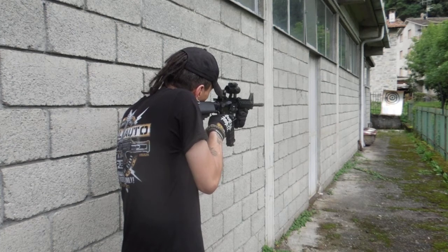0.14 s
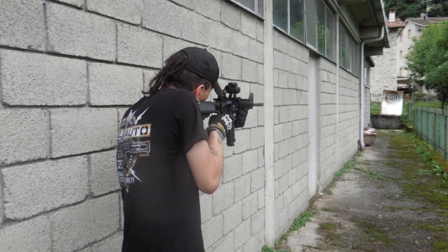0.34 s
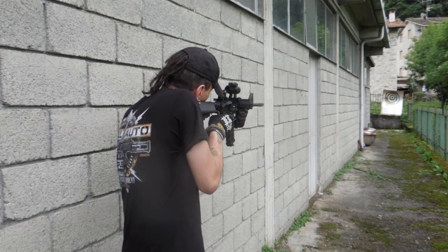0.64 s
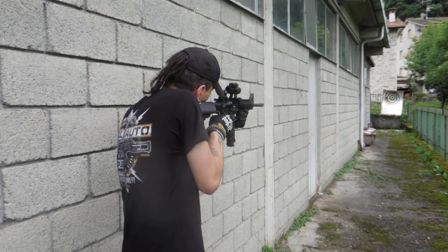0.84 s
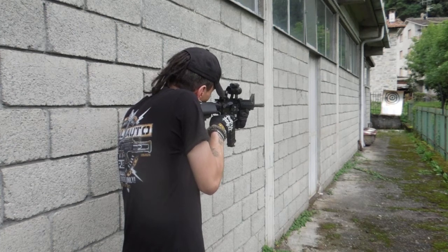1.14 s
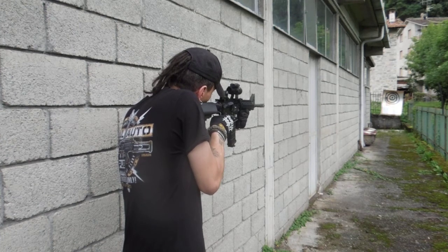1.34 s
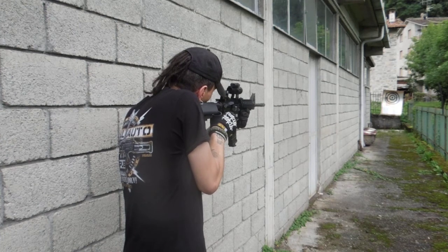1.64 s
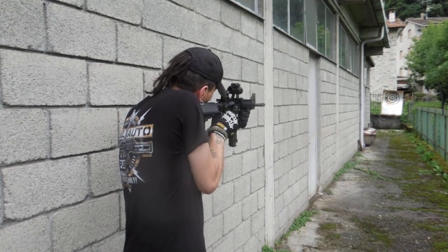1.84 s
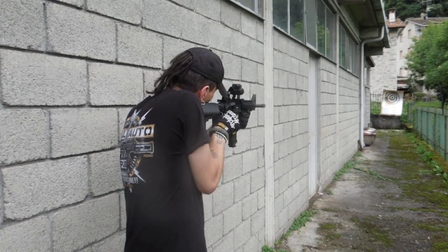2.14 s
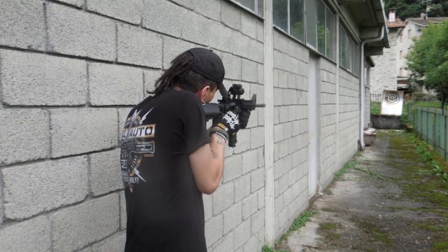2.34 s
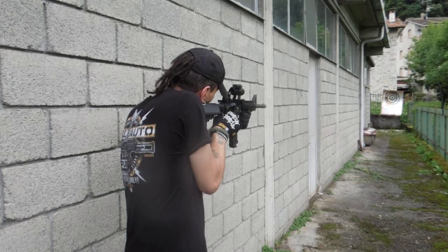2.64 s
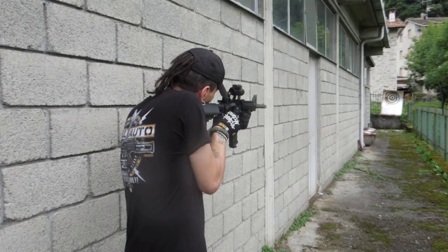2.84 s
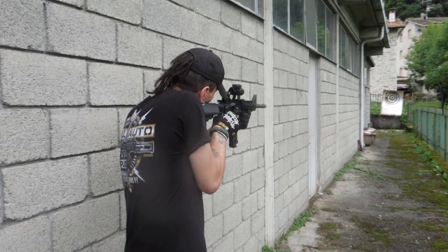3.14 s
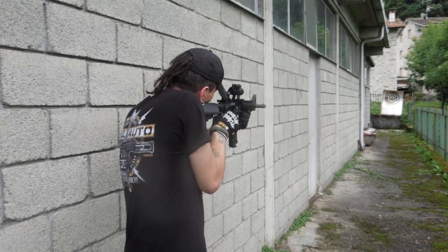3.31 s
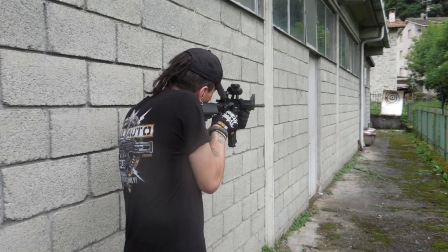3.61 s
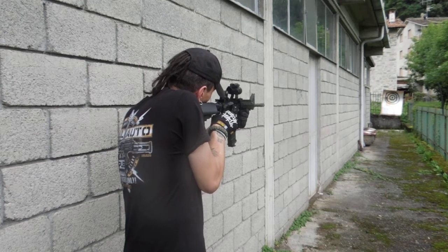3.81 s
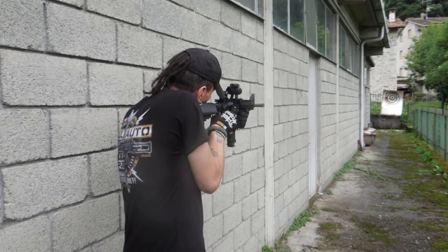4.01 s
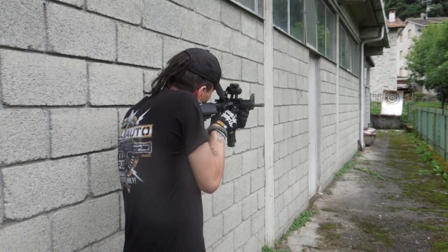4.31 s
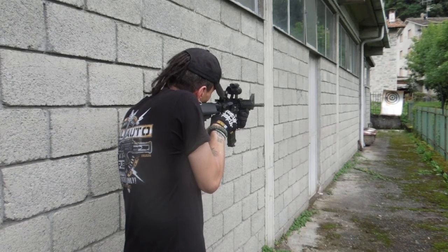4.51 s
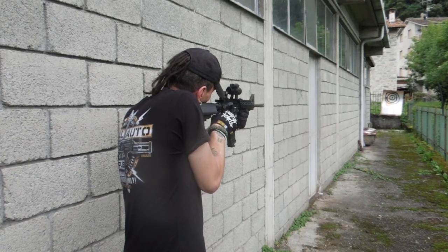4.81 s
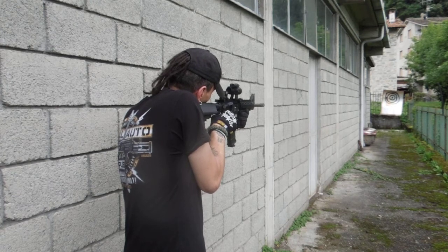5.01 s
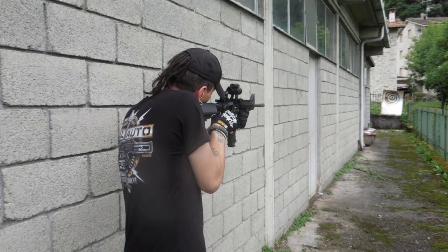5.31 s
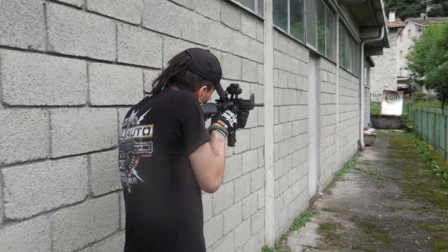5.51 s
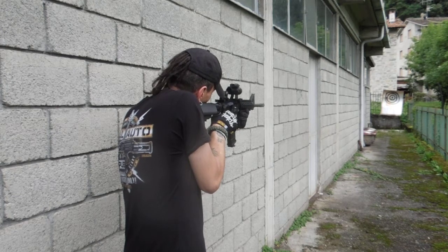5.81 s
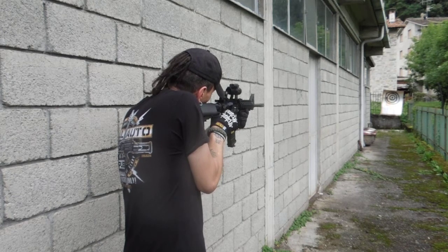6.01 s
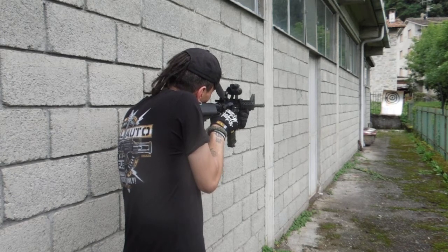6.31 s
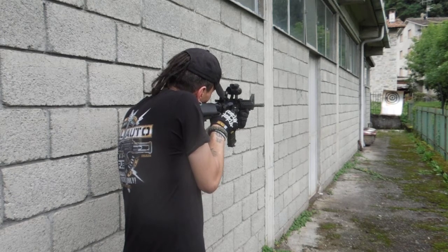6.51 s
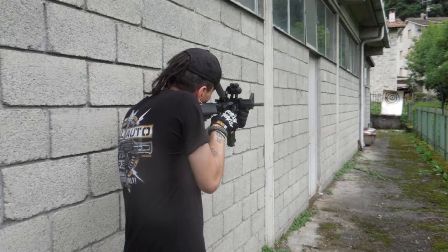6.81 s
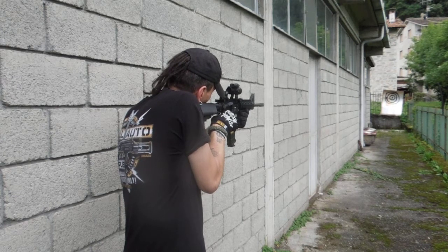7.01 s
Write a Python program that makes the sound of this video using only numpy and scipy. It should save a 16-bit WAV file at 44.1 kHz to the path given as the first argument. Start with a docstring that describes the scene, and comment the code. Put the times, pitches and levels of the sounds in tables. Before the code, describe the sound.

Close by, an electric airsoft rifle fires a steady string of single snaps, each with a tiny gear whirr, dry crack and small air pop. After a pause come four short automatic bursts about a second apart, then two single shots. Pellets ping on a distant sheet-metal target nearly half a second later. A hard block wall adds brief clatter; faint outdoor rush lies beneath. Close stereo microphone with automatic level control.

```python
"""An electric airsoft rifle is fired beside a block wall: a string of single shots, four bursts, two more shots.
In each round the gearbox whirrs as it draws the piston back, then the piston slams home and the muzzle pops.
Almost half a second later the pellet pings on a far metal target; the first pings are from shots before the start.
Low noise lies underneath: outdoor rush, plus the target's low ringing after the bursts. A low hum comes and goes
near the last single shots, and ticks dot the pauses. A gain control starts turned down, sinks and recovers."""
import sys
import numpy as np
from scipy import signal
from scipy.fft import rfft, irfft
from scipy.io import wavfile
from scipy.ndimage import uniform_filter1d

SR = 44100
rng = np.random.default_rng(int(sys.argv[2]) if len(sys.argv) > 2 else 0)


def persist_wave(psi):
    """Save psi, clipped to +-1, as 16-bit WAV."""
    counts = np.round(np.clip(psi, -1, 1) * 32767).astype(np.int16)
    wavfile.write(sys.argv[1], SR, np.atleast_2d(counts).T)


N = 315315

# All levels in the tables are relative and get scaled where they are used.
# Colour of the low background noise: [f/Hz, level/dB]
BACKGROUND_COLOUR = [(15, -25), (28, -2), (70, -5), (120, -4), (240, -5), (430, -6.5), (600, -13),
                     (850, -11.5), (1400, -21), (3500, -30), (14300, -38)]
# Level of the low background noise: outdoor rush, plus the target's low ringing after the bursts: [t/s, level/dB]
BACKGROUND_LEVEL = [(0, -41.5), (1.5, -42), (2.3, -44.5), (3.1, -43.5), (4.3, -38), (5.1, -45.5),
                    (5.5, -37.5), (6.1, -43.5), (7.15, -38)]
# Path of the low hum: [t/s, f/Hz, level/dB]
HUM_PATH = [(1.0, 159, -58), (1.148, 158.7, -45.5), (1.501, 164.6, -40), (1.62, 170, -54),
            (1.75, 171.6, -43), (1.88, 172.3, -56), (2.0, 171.5, -41), (2.149, 168, -64)]
# Faint ticks in the pauses: [t/s, level/dB]
TICK_TIMES = [(.577, -46), (.736, -39), (4.15, -38), (5.09, -33), (6.058, -27), (6.09, -34)]

# Trigger pulls: [t of the first slam/s, number of rounds, piston crack level/dB, body clatter level/dB,
#  pellet lateness/s, ping level/dB]
TRIGGER_PULLS = [(-.364, 1, -5, -20, 0.003, -8), (-.205, 1, -5, -20, .0041, -10),
                 (-.01, 1, -9, -18, -0.0018, -13), (.1356, 1, -3.5, -18.5, 0.0082, -12),
                 (0.3031, 1, -4.5, -19.5, .0044, -13.5), (.4778, 1, -6, -20.5, 0.0036, -14),
                 (0.66, 1, -8, -22, 0.0034, -10.5), (0.819, 1, -7, -22.5, -0.00011, -10.5),
                 (.9963, 1, -8.5, -22, 0.0038, -13.5), (1.1646, 1, -5, -20, .0039, -15),
                 (1.3412, 1, -5.5, -19, 0.0047, -16), (1.4968, 1, -7, -22, 0.0031, -15),
                 (2.7902, 6, -2.5, -16, .0016, -12), (3.7927, 5, -4, -16, -0.0049, -10.5),
                 (4.7335, 5, -8.5, -19.5, -0.0069, -14), (5.6746, 6, -4.5, -15, -.0048, -12.5),
                 (6.81, 1, -4.5, -13.5, 0, -16), (7.0385, 1, -1.5, -13, -0.0063, -18)]
CYCLE_S = .0613  # one round in automatic fire
FLIGHT_S = .445  # a pellet's usual flight plus the sound's way back
FLIGHT_STEP_S = -.001  # each further pellet of a burst takes a little less time
CRACK_STEP_DB, CLATTER_STEP_DB, PING_STEP_DB = -0.46, -0.41, 0.13  # from one round of a burst to the next
COLD_START_DB, RUNNING_DB = -1, 4  # the gears are softer from rest than when already turning

# Colour of the target's bright ping: [f/Hz, level/dB]
PING_COLOUR = [(200, -16), (600, -38), (1700, -11.5), (3500, -15), (7000, -11), (8800, -4), (10800, 3.5),
               (12500, 2.5), (14300, -9)]
# Colour of the target's shimmer: [f/Hz, level/dB]
SHIMMER_COLOUR = [(80, -30), (300, -2.5), (600, -4), (1700, -0.5), (2100, -14), (2600, -2.5), (4500, 1),
                  (7200, 0.5), (9500, 4), (11500, 2.5), (14300, 0.5)]
# Colour of the lingering, duller part of the ring: [f/Hz, level/dB]
LINGER_COLOUR = [(80, -20), (300, -10.5), (600, -1.5), (1100, -3.5), (1700, -3), (2600, -3), (5000, -12),
                 (14300, -12.5)]
# Ringing tones of the target sheet: [f/Hz, level/dB, time to fall 60 dB/s]
SHEET_TONES = [(255, -19, 0.28), (306.3, -14, 1), (1060, -17.5, 1), (1570, -13.5, 0.85), (1705, -9, 0.57),
               (1735, -11, .4), (2550, -9, 0.45), (3350, -9.5, 0.51), (3700, -13, 0.29), (5790, -15, 0.23)]
RING_DB = -13.5  # scales the target's ring against its ping

# Gearbox effort through one winding cycle: [t from the slam/s, level/dB]
WINDING_EFFORT = [(-.075, -35.5), (-.062, -7.5), (-.056, -3.5), (-.035, -0.5), (-.008, 1.5), (.002, -4),
                  (.025, -23)]
# Latch and gear clacks in each cycle: [t from the slam/s, level over the gearbox/dB]
CLACK_TIMES = [(-.0583, 11.5), (-.0315, 9), (-.012, 9.5)]
# Meshing teeth over the whole scene: [t/s, basic pitch f/Hz, change in gearbox level/dB]
TOOTH_MESH = [(0, 2420, -1.5), (1.5, 2514, -4), (2.698, 3270, -2.5), (6.001, 3206, -8), (7.1, 3280, -5.5)]
# Colour of the grinding gears: [f/Hz, level/dB]
GEAR_COLOUR = [(80, -52), (300, -10), (600, -8.5), (780, 2.5), (1150, -2), (1700, -1), (3200, 2), (4200, 2),
               (5200, 1.5), (7200, -5), (8200, 0), (9200, -2), (12400, 0), (14300, -1.5)]

# Muzzle pop thrown back by ground, wall and eaves: [delay/s, signed gain]
NEAR_ECHOES = [(.0093, -1.3), (0.011, 0.18), (0.0122, 0.98), (0.0147, -0.44), (0.0175, 0.25), (0.022, 0.87),
               (0.0285, -0.1), (0.0315, 0.8)]
POP_DB, POP_FOLLOWS = -15.5, 0.51  # puff of air, and how closely it follows the slam (dB per dB)

# Colour of the piston crack: [f/Hz, level/dB]
CRACK_COLOUR = [(200, -27), (900, -23), (1600, -8.5), (3200, -15), (4700, -2.5), (6000, -3), (7100, -8),
                (8400, 1.5), (9800, 1), (10700, -3.5), (11800, 2.5), (13000, -4.5), (13800, 5), (14500, -6)]
# Colour of the clatter from the wall: [f/Hz, level/dB]
CLATTER_COLOUR = [(100, -13), (550, -8), (720, 3.5), (1100, -5), (1280, -2.5), (2000, 1), (2600, 0),
                  (3400, 0), (4300, -6), (5600, 1), (7200, -3.5), (8400, 0.5), (10500, -2.5), (14300, -0.5)]
# Narrow rings of the gearbox shell and spring: [f/Hz, level/dB, time to fall 60 dB/s]
SHELL_TONES = [(436.3, -19, 0.2), (695.5, -22, 0.192), (1108, -18, 0.21), (2487, -11, 0.097),
               (3520, -15.5, 0.15), (8290, -10.5, 0.086), (8400, -37, .07), (9920, -15, 0.053),
               (12800, -20, .07), (14300, -27, .06)]
# Colour of the yard's reply, also used for the ticks: [f/Hz, level/dB]
YARD_COLOUR = [(100, -17.5), (500, -10.5), (1050, 4.5), (1400, -4.5), (3500, -7), (7000, -13.5),
               (14300, -12)]
# Late slaps from the yard: [delay/s, level/dB]
YARD_SLAPS = [(.072, -3.5), (.101, -16)]
DETUNE = .006  # typical share by which each blow shifts a ringing tone's pitch

# Basic stereo width of noise: [f/Hz, side level over mid level/dB]
STEREO_WIDTH = [(50, -9), (200, -21), (500, -28), (2800, -32), (4400, -15), (8000, -5), (14000, -3.5)]
# Uneven microphone pair: [f/Hz, left level minus right level/dB]
MIC_TILT = [(60, .7), (250, 0), (5000, 0), (8200, -1.8), (14000, -1.5)]
EDGE_HZ = 14330  # band limit
# gain control: where it starts, how firmly, how fast it moves, how fast it lets go, how far down it opens
THRESHOLD_DB, RATIO, REACT_S, RECOVER_DB_PER_S, OPENING_DUCK_DB = -22, 3.32, 0.23, 19, 11


def amp(db):
    """Turns decibels into a plain factor."""
    return 10 ** (np.asarray(db) / 20)


def evened(x):
    """Scales to rms 1."""
    return x / np.sqrt(np.mean(x ** 2) + 1e-20)


def read(points, hz):
    """Reads a table on a log-frequency axis."""
    f, value = np.transpose(points)
    return np.interp(np.log(hz + 1), np.log(f + 1), value)


def add(mix, s, sound):
    """Mixes a sound in at time s, cutting off whatever falls outside the scene."""
    start = round(s * SR)
    sound = sound[..., max(-start, 0):]
    part = mix[:, max(start, 0):][:, :sound.shape[-1]]
    part += sound[..., :part.shape[-1]]


def smooth_noise(size, span):
    """Slow random wander of rms 1: noise averaged over a span of samples."""
    return evened(uniform_filter1d(rng.standard_normal(size), size=span))


def noise(spectrum, wide_db, size):
    """Stereo noise of a given colour; the middle of its range is closest to mono."""
    hz = np.fft.rfftfreq(size, 1 / SR)
    mid, side = rfft(rng.standard_normal((2, size))) * amp(read(spectrum, hz))
    side = side * amp(read(STEREO_WIDTH, hz) + wide_db)
    return evened(irfft(np.array([mid + side, mid - side]), size))


def recoloured(spectrum, spread_db):
    """No two blows land alike: each resonance answers a little more or less."""
    hz, db = np.transpose(spectrum)
    return np.column_stack([hz, db + spread_db * rng.standard_normal(len(hz))])


def decay(t, rise, t60):
    """Envelope that starts at t = 0, rises and dies away, falling 60 dB in t60 seconds."""
    t = np.maximum(t, 0)
    return (1 - np.exp(-t / rise)) * amp(-60 * t / t60)


def blend(fixed, fresh, share):
    """Part of a sound repeats with every blow, the rest is new."""
    share = np.clip(share, 0, 1)
    return np.sqrt(share) * fixed + np.sqrt(1 - share) * fresh


def rattle(depth_db, size):
    """Millisecond unevenness of loose parts and scattered echoes."""
    return evened(amp(depth_db * smooth_noise(size, span=70)))


def struck(table, t):
    """Each blow wakes the tones with its own strengths, pitches and phases; loose parts roughen the ring."""
    hz, db, t60 = np.transpose(table)[:, :, None]
    strength = rng.uniform(0.57, 1.22, hz.shape) * amp(db)
    waver = smooth_noise(len(t), span=600)
    pitch = hz * (1 + DETUNE * rng.standard_normal(hz.shape))
    turns = pitch * t + rng.random(hz.shape)
    tones = np.cos(2 * np.pi * turns + .8 * waver)
    return (strength * decay(t, rise=0.00038, t60=t60) * tones).sum(0)


def rounds():
    """Every round fired: (s of the slam, crack dB, clatter dB, gears dB, s of the hit, ping dB)."""
    for start, count, crack_db, body_db, late, ping_db in TRIGGER_PULLS:
        for k in range(round(count)):
            s = start + k * CYCLE_S
            clatter_db = body_db + k * CLATTER_STEP_DB
            gears_db = clatter_db + (RUNNING_DB if k else COLD_START_DB)
            hit = s + FLIGHT_S + late + k * FLIGHT_STEP_S
            yield s, crack_db + k * CRACK_STEP_DB, clatter_db, gears_db, hit, ping_db + k * PING_STEP_DB


def background():
    """Low coloured noise stands for the outdoor rush, plus the target's low ringing after the bursts."""
    low_noise = noise(BACKGROUND_COLOUR, wide_db=1, size=N)
    return low_noise * amp(np.interp(np.arange(N) / SR, *np.transpose(BACKGROUND_LEVEL)))


def hum():
    """A soft far-off tone, one sine of drifting pitch, wavers, swells and fades."""
    s, hz, db = np.transpose(HUM_PATH)
    t = np.arange(N) / SR
    waver = 1 + .025 * smooth_noise(N, span=2500)
    level = amp(np.interp(t, s, db)) * (t > s[0]) * (t < s[-1])
    phase = 2 * np.pi * np.cumsum(np.interp(t, s, hz) * waver) / SR
    return np.sqrt(2) * level * np.sin(phase)


def ticks():
    """Small dry ticks, short puffs of noise that die away quickly."""
    out, t = np.zeros((2, N)), np.arange(4096) / SR
    for s, db in TICK_TIMES:
        colour = noise(recoloured(YARD_COLOUR, spread_db=3), wide_db=-3, size=len(t))
        add(out, s, amp(db + 1) * decay(t, rise=.001, t60=0.055) * colour)
    return out


def target():
    """Each pellet gives a bright ping, a faint echo of it and a shimmer of sheet metal that dulls as it fades."""
    out, t = np.zeros((2, N)), np.arange(32768) / SR
    for *_, hit, ping_db in rounds():
        strike = decay(t, rise=0.00069, t60=0.054)
        strike += amp(-15.0) * decay(t - .0495, rise=0.00052, t60=0.12)  # the echo
        ping = strike * noise(PING_COLOUR, wide_db=0.5, size=len(t)) * rattle(depth_db=0.5, size=len(t))
        shimmer = decay(t, rise=0.00043, t60=0.41) * noise(SHIMMER_COLOUR, wide_db=1, size=len(t))
        shimmer *= rattle(depth_db=-0.2, size=len(t))
        linger = decay(t, rise=0.011, t60=1.0) * noise(LINGER_COLOUR, wide_db=-16, size=len(t))
        ring = amp(8.0) * shimmer + amp(-7.5) * linger + struck(SHEET_TONES, t)
        add(out, hit, amp(ping_db) * (amp(5.5) * ping + amp(RING_DB) * ring))
    return out


def gearbox():
    """The motor spins up with a dull whirr; under load the gears grind and whine while latch and rack clack."""
    out, t = np.zeros((2, N)), np.arange(6000) / SR - .1  # t = 0 is the slam
    effort = amp(np.interp(t, *np.transpose(WINDING_EFFORT))) * signal.windows.tukey(len(t), .1)
    spin_up = amp(-5.0) * np.exp(-((t + 0.0672) / 0.0056) ** 2)
    dull = signal.butter(3, 4300, fs=SR, output="sos")
    teeth = noise(GEAR_COLOUR, wide_db=-12.5, size=len(t))  # the same teeth meet in every cycle
    when, mesh_hz, mesh_db = np.transpose(TOOTH_MESH)
    for s, _, _, gears_db, _, _ in rounds():
        wobble = smooth_noise(len(t), span=200)
        speed = 1 - .24 * np.exp(-(t - t[0]) / 0.019) + 0.016 * wobble
        turn = 2 * np.pi * np.cumsum(np.interp(s, when, mesh_hz) * speed) / SR
        fresh = noise(recoloured(GEAR_COLOUR, spread_db=3), wide_db=-13, size=len(t))
        grind = blend(teeth, fresh, share=0.34) * rattle(depth_db=2.5, size=len(t))
        whine = amp(-12) * np.sin(turn)
        whirr = spin_up * signal.sosfilt(dull, grind)
        sound = effort * (amp(2) * grind + whine) + whirr
        for delay, db in CLACK_TIMES:
            force = amp(db + 1.9 * rng.standard_normal())
            clack = noise(recoloured(GEAR_COLOUR, spread_db=1.0), wide_db=-7.5, size=len(t))
            sound += force * decay(t - delay, rise=0.00088, t60=.045) * clack
        level_db = gears_db + np.interp(s, when, mesh_db)
        add(out, s + t[0], amp(level_db) * sound)
    return out


def muzzle():
    """The puff of air is dull from behind; its forward, sharper part comes back as a flutter of echoes."""
    out, t = np.zeros((2, N)), np.arange(3000) / SR - .01
    pop = -.9 * np.exp(-(t / 0.0015) ** 2)
    for delay, gain in NEAR_ECHOES:
        pop += gain * np.exp(-((t - delay) / 0.0006) ** 2)
    pop = signal.sosfilt(signal.butter(1, 45, "high", fs=SR, output="sos"), pop)
    for s, crack_db, *_ in rounds():
        add(out, s + t[0], amp(POP_DB + POP_FOLLOWS * crack_db) * pop)
    return out


def piston():
    """The slam cracks in the gearbox shell; the wall returns a duller clatter, the yard late slaps."""
    out, t = np.zeros((2, N)), np.arange(16384) / SR
    shell = noise(CRACK_COLOUR, wide_db=-6.5, size=len(t))
    wall = noise(CLATTER_COLOUR, wide_db=-6.0, size=len(t))
    # near surfaces return separate knocks over a smooth, scattered decay
    knocks = sum(abs(gain) * decay(t - delay, rise=0.0003, t60=0.011) for delay, gain in NEAR_ECHOES)
    spread = amp(6.0) * decay(t, rise=0.0015, t60=0.077)
    spread += amp(6.5) * decay(t - .0105, rise=0.0014, t60=0.14)
    spread += amp(-0.5) * knocks
    late = amp(-13.5) * decay(t, rise=0.024, t60=0.64)
    for delay, db in YARD_SLAPS:
        late += amp(db) * decay(t - delay, rise=0.0018, t60=0.028)
    for s, crack_db, body_db, *_ in rounds():
        fresh = noise(recoloured(CRACK_COLOUR, spread_db=0.5), wide_db=-11, size=len(t))
        crack = blend(shell, fresh, share=0.47) * decay(t, rise=0.00046, t60=0.027)
        slam = amp(10.0) * crack + struck(SHELL_TONES, t)
        scatter = noise(recoloured(CLATTER_COLOUR, spread_db=3.0), wide_db=-10.5, size=len(t))
        clatter = blend(wall, scatter, share=0.44) * rattle(depth_db=1.0, size=len(t))
        yard = late * noise(YARD_COLOUR, wide_db=-4.5, size=len(t))
        add(out, s, amp(crack_db) * slam + amp(body_db) * (spread * clatter + yard))
    return out


def gain_control(x):
    """Loud cracks pull the gain down over a few rounds; it creeps back up in the pauses."""
    power = abs(uniform_filter1d((x ** 2).mean(0), size=660))
    level_db = 10 * np.log10(power + 1e-12)
    recovery = np.arange(N) / SR * RECOVER_DB_PER_S
    # hold each peak, then let the held level sink at the recovery rate
    held_db = np.maximum.accumulate(level_db + recovery) - recovery
    wanted_db = np.maximum(held_db - THRESHOLD_DB, 0) * (1 - 1 / RATIO)
    wanted_db = np.maximum(wanted_db, OPENING_DUCK_DB - recovery)
    keep = np.exp(-1 / (REACT_S * SR))
    duck_db = signal.lfilter([1 - keep], [1, -keep], wanted_db, zi=[OPENING_DUCK_DB])[0]
    return x * amp(-duck_db)


def scene():
    """Background, target and rifle together."""
    return background() + hum() + ticks() + target() + gearbox() + muzzle() + piston()


def record(dry):
    """The treble leans right, gain control ducks the volleys, peaks beyond full scale clip, then the band limit."""
    lean_db = read(MIC_TILT, np.fft.rfftfreq(N, 1 / SR)) / 2
    heard = irfft(rfft(dry) * amp([lean_db, -lean_db]), N)
    clipped = np.clip(gain_control(heard), -1, 1)
    low_pass = signal.firwin(511, EDGE_HZ, window=("kaiser", 8), fs=SR)
    return signal.oaconvolve(clipped, low_pass[None], "same")


dry = scene()
out = record(dry)
persist_wave(out)
```